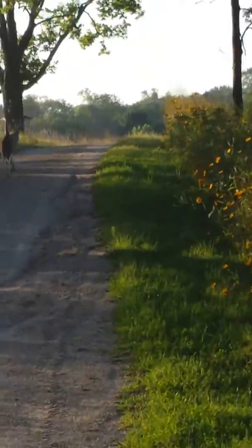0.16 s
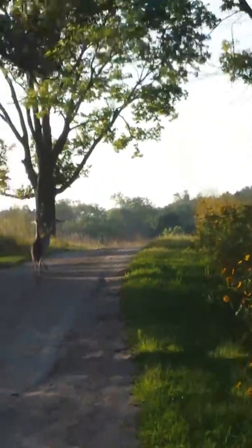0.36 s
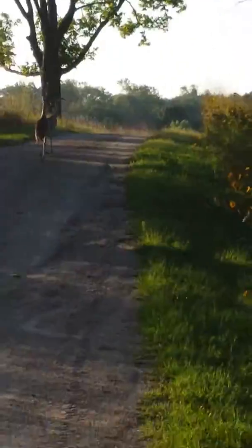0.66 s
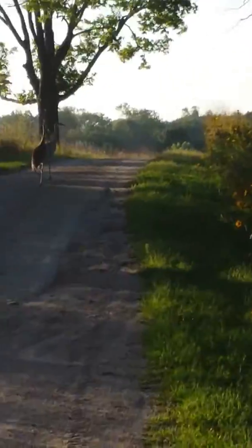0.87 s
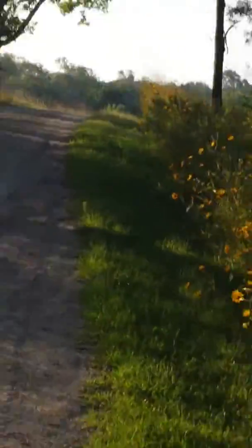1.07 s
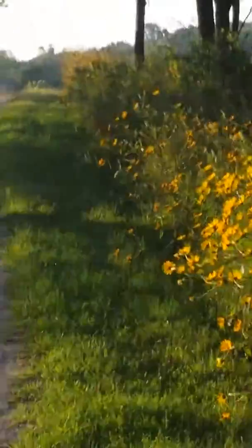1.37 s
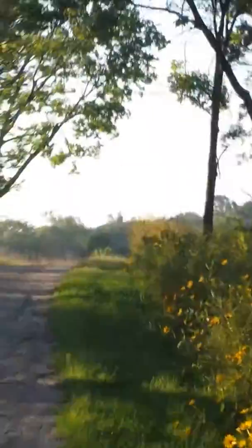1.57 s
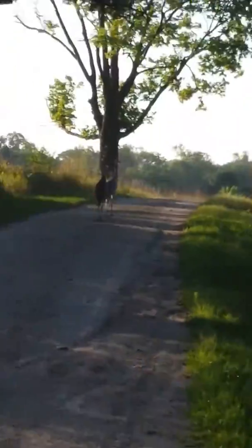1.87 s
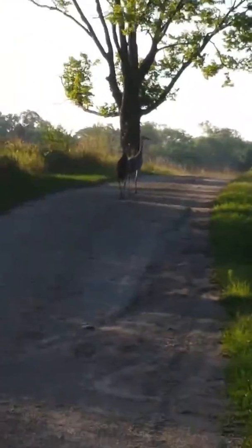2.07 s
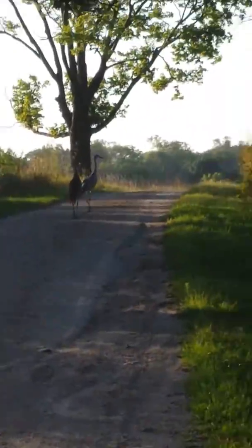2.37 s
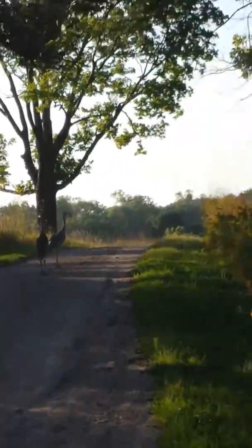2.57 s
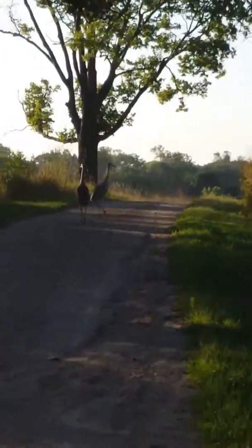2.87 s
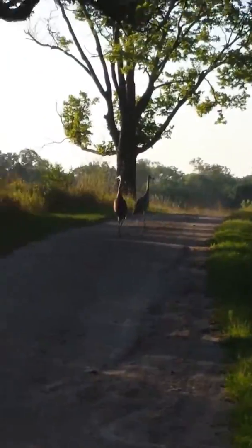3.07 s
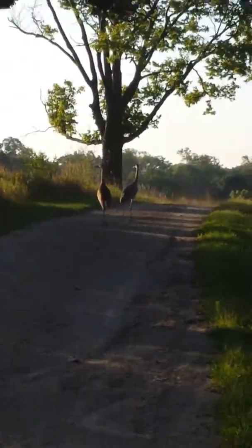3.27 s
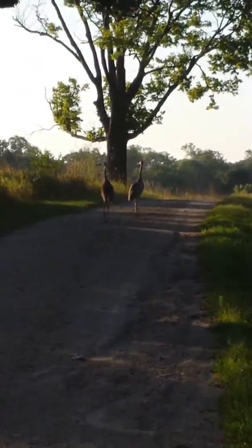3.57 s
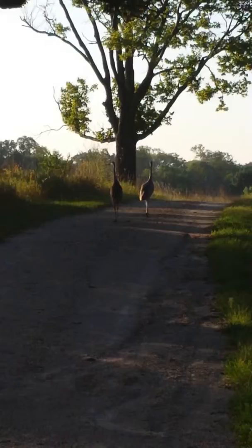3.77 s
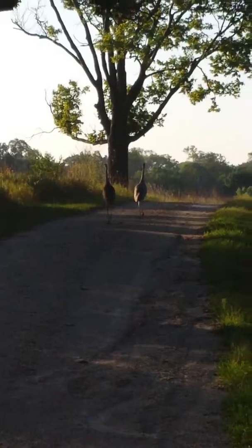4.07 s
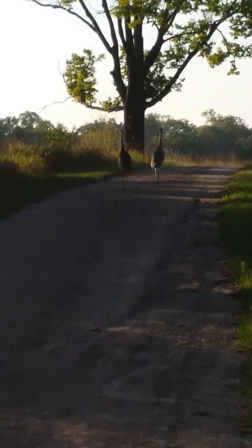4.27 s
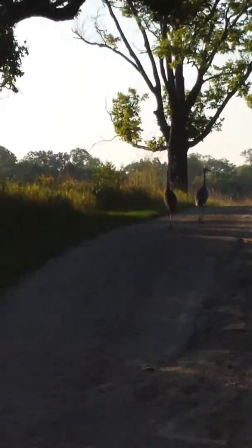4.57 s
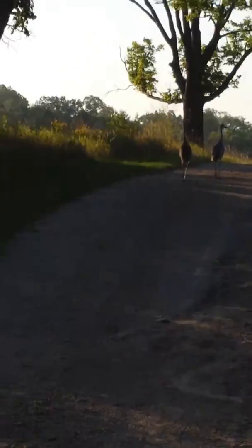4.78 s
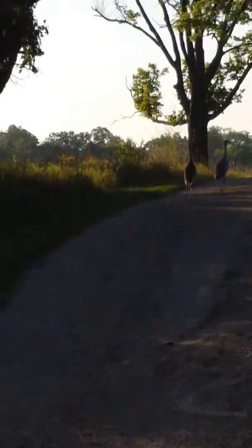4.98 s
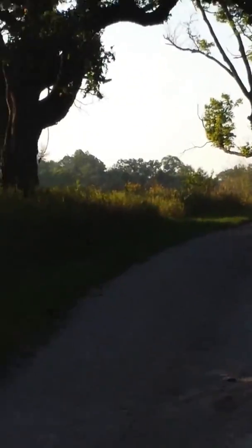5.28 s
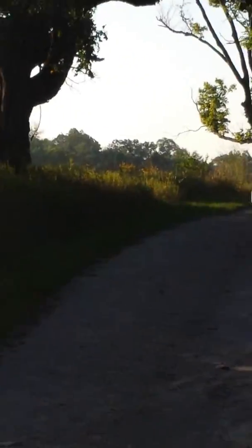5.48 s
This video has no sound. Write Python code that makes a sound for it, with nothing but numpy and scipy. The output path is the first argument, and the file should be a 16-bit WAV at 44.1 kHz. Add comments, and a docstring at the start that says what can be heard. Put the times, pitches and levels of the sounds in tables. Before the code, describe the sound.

A loud, hollow crane roll is already under way, with a higher, hoarser, fainter bird answering between its beats, and trees return a brief scattered echo. Then gritty footsteps and pebble clicks on a dirt track, with sharp finger ticks on the handheld device and light wind bumps mostly on the left. High crickets and a steady insect drone run throughout; the lower bird calls again at the very end.

```python
"""Two cranes on a dirt track

Two sandhill cranes give rolling calls, each beat a snap of the syrinx through a resonant throat, and
the trees around return scattered echoes. Ground crickets trill in the verge over a drone of far insects.
Someone follows with a hand-held camera: soles grind the grit, pebbles click, wind and soft pushes touch
mostly the left microphone, fingers tick and knock on the case. The sharpest ticks make the gain duck."""
import sys
import numpy as np
from scipy import signal
from scipy.fft import rfft, irfft, next_fast_len
from scipy.io import wavfile
from scipy.ndimage import uniform_filter1d, minimum_filter1d

SR = 44100
rng = np.random.default_rng(int(sys.argv[2]) if len(sys.argv) > 2 else 0)


def generate_wav(signal):
    """Clip the signal to [-1, 1] and save it as 16-bit WAV at the path in sys.argv[1]."""
    frames = np.transpose(np.atleast_2d(signal))
    scaled = np.clip(frames, -1, 1) * 32767
    pcm = np.round(scaled).astype(np.int16)
    wavfile.write(sys.argv[1], SR, pcm)


N = 248451
TIME = np.arange(N) / SR


def gain_of(db):
    """Decibels to a factor."""
    return 10 ** (np.asarray(db) / 20)


def evened(x):
    """Scales to rms 1."""
    return x / np.sqrt(np.mean(x ** 2) + 1e-20)


def read(points, hz):
    """Reads a table on a log-frequency axis."""
    f, value = np.transpose(points)
    return np.interp(np.log(hz + 1), np.log(np.abs(f) + 1), value)


def level(rows):
    """A gain curve from rows of (time_s, level_db)."""
    s, db = np.transpose(rows)
    return gain_of(np.interp(TIME, s, db))


def coloured(x, spectrum):
    """Gives a sound a spectrum, at rms 1."""
    length = x.shape[-1]
    size = next_fast_len(length)
    gain = gain_of(read(spectrum, np.fft.rfftfreq(size, 1 / SR)))
    return evened(irfft(rfft(x, size) * gain, size)[..., :length])


def drift(shape, per_s):
    """Smooth chance of rms 1: noise averaged twice over 1 / per_s seconds."""
    size = max(int(SR / per_s), 2)
    once = uniform_filter1d(rng.standard_normal(shape), size, mode="wrap")
    return evened(uniform_filter1d(once, size, mode="wrap"))


def sides(tilt_db):
    """Left and right gains for a level difference, left minus right."""
    return gain_of(np.array([[.5], [-.5]]) * tilt_db)


def diffuse(spectrum, tilt, shared):
    """Noise from all around, partly common to both microphones, at rms 1."""
    shared, size = np.clip(shared, 0, 1), next_fast_len(N)
    common = np.sqrt(shared) * rng.standard_normal(size)
    noise = common + np.sqrt(1 - shared) * rng.standard_normal((2, size))
    hz = np.fft.rfftfreq(size, 1 / SR)
    gain = gain_of(read(spectrum, hz)) * sides(read(tilt, hz))
    return evened(irfft(rfft(noise) * gain, size)[:, :N])


def add(mix, s, sound):
    """Mixes in a sound that starts at time s, cut at both ends of the mix."""
    start = round(s * SR)
    sound = sound[:, max(-start, 0):]
    part = mix[:, max(start, 0):][:, :sound.shape[1]]
    part += sound[:, :part.shape[1]]


def crane(roll, throat, dry_db, wet_db, tilt_db, after_s, after_length, after_fall, soften_db, last_db,
          snap_s, mellow_db):
    """A roll of beats, each trailed by two after-beats and by the echoes of the trees."""
    # distinct echoes from the nearest trunks, relative to the direct call: delay_s, level_db
    trunks = [(.036, -21), (.089, -24.5), (.148, -28), (.215, -32)]
    out = np.zeros((2, N))
    for s, hz, db, after_db, overtones_db, hoarse, fall, opening in roll:
        shape = [(f * opening, strength) for f, strength in throat]
        note = np.zeros((1, SR // 16))
        main = beat(hz, shape, overtones_db, hoarse, fall, snap_s=snap_s, mellow_db=mellow_db)
        add(note, 0, gain_of(db) * main[None])
        for k in (1, 2):
            after = beat(hz, shape, overtones_db + soften_db, hoarse, after_fall, after_length)
            add(note, k * after_s, gain_of(db + after_db + (k - 1) * last_db) * after[None])
        # the left microphone hears it a moment (6 samples) later
        direct = np.array([np.roll(note[0], 6), note[0]])
        add(out, s, gain_of(dry_db) * direct)
        for delay_s, echo_db in trunks:
            add(out, s + delay_s, gain_of(dry_db + echo_db) * direct)
        add(out, s, gain_of(wet_db) * trees(note[0]))
    return out * sides(tilt_db)


def beat(hz, throat, overtones_db, hoarse, fall, length=0.012, arch=.12, rasp_db=-15.5, snap_s=.0011,
         snap_db=5, mellow_db=14, rattle_db=-17):
    """The syrinx snaps open for a few cycles: harsh, then rounder, while the pitch arches and slides."""
    # air rasping as the syrinx opens, relative density: pitch_hz, level_db (per Hz)
    rasp_colour = [(300, -24), (1200, -0.5), (2400, 9.5), (3300, 3), (4300, 10), (5500, 5.5), (7500, -4.5),
                   (11300, -9.5), (13000, -44.5)]
    t = np.arange(SR // 40) / SR
    u, hoarse = np.minimum(t / length, 1), np.clip(hoarse, 0, .9)
    pitch = hz * (1 + fall * (.5 - u) + arch * (np.sin(np.pi * u) - np.pi / 4))
    # no two cycles are alike, which smears the overtones far more than the fundamental
    phase = 2 * np.pi * np.cumsum(pitch) / SR + (.08 + .6 * hoarse) * drift(len(t), 900)
    partials = []
    for k in range(1, 7):
        wander = .2 * (k - 1) * drift(len(t), 700)
        partials.append(gain_of(read(throat, k * pitch)) * np.sin(k * phase + wander))
    rasp = coloured(rng.standard_normal(len(t)), rasp_colour) * (1 + .7 * np.cos(phase))
    # hoarseness swaps the fundamental for throat-coloured noise
    croak = coloured(rng.standard_normal(len(t)), throat) * np.sqrt(.5)
    tone = np.abs(np.sin(np.pi * u)) ** .85 * ((1 - hoarse) * partials[0] + hoarse * croak)
    onset = 1 - np.exp(-(t / snap_s) ** 2)
    snap = onset * np.sqrt(1 - u) * gain_of(overtones_db + snap_db - mellow_db * u)
    # uneven slaps, one a cycle, ring the upper throat
    upper = [(hz, -40)] + [row for row in throat if row[0] > 1.7 * hz]
    rattle = coloured(rng.standard_normal(len(t)) * (1 + np.cos(phase)) ** 2, upper)
    return tone + snap * (sum(partials[1:]) + gain_of(rasp_db) * rasp + gain_of(rattle_db) * rattle)


def trees(x, clump_db=4):
    """Scattered echoes from trunks and leaves arrive in clumps, each band dying at its own speed."""
    # strength of what the trees return: pitch_hz, level_db
    echo = [(300, -25), (750, -20), (900, -4.5), (1030, 3), (1200, -0.5), (1400, -7), (1600, -8.5),
            (1880, -8.5), (2150, -5.5), (2550, -11.5), (3200, -3), (5000, -0.5), (8000, 1.5), (12000, 3)]
    # time the echoes take to fall by 60 dB: pitch_hz, t60_s
    echo_t60 = [(300, 0.82), (1000, 0.88), (2200, 0.58), (5000, 0.46), (12000, 0.33)]
    hz, t, z = signal.stft(rng.standard_normal((2, SR)), SR, nperseg=256)
    fade = gain_of(-60 * t / read(echo_t60, hz)[:, None]) * (1 - np.exp(-t / 0.006))
    clumps = uniform_filter1d(rng.standard_normal(fade.shape), size=3)
    fade *= gain_of(clump_db * evened(uniform_filter1d(clumps, size=9, axis=0)))
    # each band is evened, then takes its own strength
    fade *= gain_of(read(echo, hz))[:, None] / np.sqrt(SR * np.mean(fade ** 2, axis=1, keepdims=True))
    return signal.fftconvolve(x[None], signal.istft(z * fade, SR, nperseg=256)[1], axes=1)


def crickets(others_db=-45.0, tilt_db=-4, recede=1.0, count=10):
    """Four crickets close by, and more along the verge, each at its own pitch and pace."""
    # rhythm of the nearest crickets: first_stroke_s, period_s
    rhythms = [(.016, .0705), (.0375, .0701), (.028, .0745), (.034, .0646)]
    # their wing strokes, levels relative: top_pitch_hz, sag_hz, length_s, left_db, right_db
    strokes = [(6930, 780, .036, -34.5, -35.5), (7540, 900, .030, -41, -34.5), (7350, 600, .032, -42, -37),
               (7900, 700, .026, -54, -52)]
    # as the walker passes, the others follow this curve and the nearest go the opposite way: time_s, level_db
    crowd = [(0, 6.5), (.8, -3.5), (1.8, 0), (2.8, 2.5), (3.9, 3.5), (5.63, 3.5)]
    near = 0
    for rhythm, (hz, sag_hz, length, left_db, right_db) in zip(rhythms, strokes):
        near = near + gain_of([[left_db], [right_db]]) * cricket(*rhythm, hz, sag_hz, length)
    others = sum(cricket(rng.random(), rng.uniform(0.067, 0.07), hz, 550, .03)
                 for hz in np.linspace(6900, 7450, count))
    others = gain_of(others_db) * evened(others) * sides(tilt_db)
    return near / level(crowd) ** recede + others * level(crowd)


def cricket(first, period, hz, sag_hz, length, scatter_db=-9, scatter_s=0.045, waver_hz=55):
    """Each wing stroke draws a scraper over a file: the tone arches and sags; grass scatters it."""
    t = np.arange(SR // 10) / SR
    # time from the middle of the nearest stroke, slightly unsteady
    since = (TIME - first + .0018 * drift(N, 6) + period / 2) % period - period / 2
    u = np.clip(2 * since / length, -1, 1)
    vigour = drift(N, 13)  # a brisker stroke is higher and louder
    sag = sag_hz * (u + .1 + .12 * drift(N, 12)) ** 2
    pitch = hz - sag + waver_hz * drift(N, 705) + 50 * vigour
    stroke = np.cos(np.pi * u / 2) ** 1.6 * np.sin(2 * np.pi * np.cumsum(pitch) / SR)
    song = stroke * gain_of(1.6 * vigour + 2 * drift(N, 4))
    grass = evened(rng.standard_normal((2, len(t))) * np.exp(-t / scatter_s)) / np.sqrt(len(t))
    direct = np.array([song, np.roll(song, 1)])  # the two microphones catch it out of step
    return direct + gain_of(scatter_db) * signal.oaconvolve(song[None], grass, axes=1)[:, :N]


def footsteps(step_db=1, grains_per_s=2200, spread_db=2.5, tilt_db=4, crunch_q=2.9, count=4):
    """Grit slips under the sole in clumps as weight rolls on and off; each grain size has its own pitch."""
    # steps and scuffs, levels relative: hardest_grind_s, level_db, length_s, crunch_hz, crunch_db (to the grit)
    steps = [(0.44, -39.5, 0.69, 2200, -9.5), (1.073, -44, 0.36, 2000, -0.5),
             (1.547, -47.5, 0.41, 2220, -9), (1.66, -43, 0.15, 1000, 3), (1.731, -39.5, 0.16, 5600, -9),
             (2.408, -45, 0.047, 1500, -6), (2.537, -38, 0.34, 1390, -0.5), (2.966, -45.5, 0.43, 1310, 4),
             (4.624, -53, 0.11, 1590, 1), (5.212, -43.5, 0.59, 1869, -5.5)]
    # colour of the grit, relative density: pitch_hz, level_db (per Hz)
    grit_colour = [(30, -35), (150, -1), (500, -3.5), (900, -3), (1400, -5), (2300, -3.5), (3500, -11),
                   (6000, -6.5), (9000, -16.5), (14000, -62)]
    clump_db, clumps_per_s = 3, 200  # unevenness of the slipping, and its pace
    fade_db = 17.5  # heel and toe grind this much more softly than the middle of a step
    # three streams of grains: left, right and common to both
    grains, edges = np.zeros((3, N)), np.geomspace(250, 12000, count + 1)
    for band in zip(edges, edges[1:]):
        sizes = gain_of(spread_db * np.minimum(rng.exponential(1, (3, N)), 4))
        sizes = sizes * rng.standard_normal((3, N))
        slipping = rng.random((3, N)) < grains_per_s / SR
        slips = sizes * slipping * gain_of(clump_db * np.minimum(drift(N, clumps_per_s), 1.5))
        grains += signal.sosfilt(signal.butter(2, band, "bandpass", fs=SR, output="sos"), slips)
    grains = coloured(grains, grit_colour)
    grit, out = evened(grains[2] + 3.4 * grains[:2]), np.zeros((2, N))
    for s, db, length, hz, crunch_db in steps:
        crunch = gain_of(crunch_db) * signal.lfilter(*signal.iirpeak(hz, crunch_q, fs=SR), grit)
        out += (grit + crunch) * gain_of(db - fade_db * np.abs(2 * (TIME - s) / length) ** 0.92)
    return gain_of(step_db) * out * sides(tilt_db)


def ticks():
    """Fingers tick on the camera, whose case rings, and pebbles click underfoot."""
    # finger ticks: start_s, level_db, ring_hz, decay_ms, crack_share, tilt_db (left minus right)
    touches = [(1.201, -17, 3030, 0.93, 0.85, 5), (1.544, -20, 3000, .5, 1, 22),
               (1.69, -7, 3500, 0.28, 0.28, -7.5), (1.804, -6, 1290, 1, 0.65, 35),
               (2.0749, 15.5, 6340, 0.43, 0.0022, 31), (2.5159, -3.5, 5420, 1.5, 0.74, 25),
               (2.852, -20, 4500, .39, 0.88, 17), (4.2718, -18.5, 3570, 0.66, 0.88, 15.5),
               (4.3507, -2, 2900, 1.3, 1, 8.5), (4.3592, -21, 6000, .4, .8, 8),
               (4.3786, -2, 3420, 0.13, 0.78, 39), (4.3853, 1, 2100, 0.41, 0.3, -23)]
    # ring of the case, relative to the crack: pitch_hz, level_db, decay_ms
    case = [(1380, -39, 1.2), (1800, -36, 1.4), (2940, -26, 1.4), (3500, -24.5, 1.1), (5600, -18, 0.59)]
    # pebbles under the shoe: start_s, level_db, ring_hz
    pebbles = [(1.008, -29.5, 2100), (1.041, -25.5, 600), (1.105, -24, 1800), (1.13, -28, 2090),
               (1.1762, -30, 2700), (1.5563, -29.5, 2110), (1.620, -30, 2140), (1.661, -29, 1000),
               (1.674, -23.5, 1380), (1.7229, -23, 1330), (1.8202, -25.5, 1280), (2.631, -32, 2260),
               (2.6614, -25.5, 1500), (5.135, -31, 2130), (5.196, -24, 1980), (5.225, -25, 1375),
               (5.227, -23.5, 1870), (5.2578, -32, 3120), (5.262, -35, 3270)]
    out = np.zeros((2, N))
    for s, *touch in touches:
        add(out, s, tick(*touch, modes=case))
    for s, db, hz in pebbles:
        add(out, s, pebble(db, hz))
    return out


def tick(db, hz, decay_ms, crack, tilt_db, modes=(), tail_db=-34, tail_s=0.0094, rise_s=.00006):
    """A sharp crack and a ring of a few cycles, then a faint rustle."""
    # colour of the crack and rustle, relative density: pitch_hz, level_db (per Hz)
    crack_colour = [(100, -2), (600, 8), (1500, 9.5), (5000, 8.5), (7500, -1.5), (10000, -20), (14000, -59)]
    t = np.arange(SR // 12) / SR
    snap = coloured((np.arange(len(t)) == 8) * 1., crack_colour) * (t < .01)
    ring = np.sin(2 * np.pi * hz * t) * np.exp(-t * 10 ** 3 / decay_ms) * (1 - np.exp(-t / rise_s))
    rustle = gain_of(tail_db) * coloured(rng.standard_normal(len(t)), crack_colour) * np.exp(-t / tail_s)
    case = sum(gain_of(mode_db - 20 / np.log(10) * t * 10 ** 3 / ms) * np.sin(2 * np.pi * f * t)
               for f, mode_db, ms in modes)
    touch = (1 - crack) * ring + crack * (rustle + case - snap / snap.max())
    return gain_of(db - abs(tilt_db) / 2) * sides(tilt_db) * touch  # db holds on the louder side


def pebble(db, hz, crunch_db=-5, crunch_s=0.0018):
    """A stone clicks against its neighbours and crushes the sand between them."""
    decay_ms, crack_share, tilt_db = 1, .15, 6.5
    t = np.arange(SR // 12) / SR
    sand_colour = [(hz / 4, -18), (hz, 0), (2 * hz, -5), (5 * hz, -28)]
    sand = coloured(rng.standard_normal((2, len(t))), sand_colour)
    crunch = gain_of(db + crunch_db - abs(tilt_db) / 2) * sides(tilt_db) * sand * np.exp(-t / crunch_s)
    return tick(db, hz, decay_ms, crack_share, tilt_db) + crunch


def knocks(low_hz=115, sink_s=0.00256, boom_s=0.012):
    """A finger bumps the case: the ring sinks at once to a short low boom."""
    # duller bumps: start_s, level_db, top_pitch_hz, decay_ms, boom_db (to the blow), tilt_db (left minus right)
    bumps = [(1.5444, -21, 600, 1.1, -19, 16), (1.6895, -21.5, 1050, 0.98, -18, -8),
             (2.5152, -6, 1150, 0.56, -10, 22), (4.3498, -18, 1690, 0.47, -13.5, 26),
             (4.3860, -11.5, 990, 1.36, -26, -12)]
    out, t = np.zeros((2, N)), np.arange(SR // 12) / SR
    for s, db, top_hz, blow_ms, boom_db, tilt_db in bumps:
        pitch = low_hz + (top_hz - low_hz) * np.exp(-t / sink_s)
        fade = np.exp(-t * 10 ** 3 / blow_ms) + gain_of(boom_db) * np.exp(-t / boom_s)
        swing = np.sin(2 * np.pi * np.cumsum(pitch) / SR) * fade
        add(out, s, gain_of(db - abs(tilt_db) / 2) * sides(tilt_db) * swing)
    return out


def thumps(length=0.014, tilt_db=22):
    """Each push swings the diaphragm out and back about twice."""
    # soft pushes on the left microphone: start_s, left_level_db, pitch_hz
    pushes = [(0.864, -45, 149.1), (.946, -16, 123), (1.361, -20.5, 100), (5.261, -18.5, 129),
              (5.293, -17.5, 125), (5.377, -16, 112)]
    out, t = np.zeros((2, N)), np.arange(SR // 25) / SR
    for s, db, hz in pushes:
        swing = np.sin(2 * np.pi * hz * t) * np.sin(np.pi * np.minimum(t / length, 1)) ** 2
        add(out, s, gain_of([[db], [db - tilt_db]]) * swing)
    return out


def wind(left_db=4, right_db=-12):
    """Gusts swell and die over a light breeze, nearly all on the left microphone."""
    # separate gusts, before the side gains: peak_s, level_db, length_s
    gust_rows = [(0.132, -30.5, 0.072), (0.22, -33, 0.049), (0.35, -35, 0.11), (0.501, -32.5, 0.13),
                 (0.589, -34, 0.033), (0.886, -34.5, 0.15), (1.092, -30.5, 0.014), (1.21, -34, 0.027),
                 (1.433, -43, 0.13), (1.543, -39.5, 0.059), (5.344, -35, 0.15), (5.47, -33.5, 0.024),
                 (5.534, -33.5, 0.045)]
    # colour of the buffeting, relative density: pitch_hz, level_db (per Hz)
    buffet = [(12, -40), (20, -16.5), (43, -1), (101, 5), (162, -3), (274, -21.5), (335, -13), (600, -60),
              (780, -60.5), (1320, -120)]
    # light breeze on the microphone, before the side gains: time_s, level_db
    breeze = [(0, -45), (1.4, -50), (2.1, -63.5), (4.9, -78), (5.63, -40)]
    eddies = coloured(rng.standard_normal((2, N)), buffet)
    # flattened, so that breeze and gusts set the strength
    eddies /= np.sqrt(uniform_filter1d(eddies ** 2, size=1400) + 0.028)
    gusts = sum(gain_of(db) * np.exp(-(2 * (TIME - s) / length) ** 2) for s, db, length in gust_rows)
    return eddies * (level(breeze) + gusts) * gain_of([[left_db], [right_db]])


def meadow(chorus_db=-48, air_db=-47, flutter_db=2.0, crickets_db=-0.83):
    """The crickets, the fluttering blur of far insects and the low air, both as diffuse noise."""
    # drone of distant insects, relative density: pitch_hz, level_db (per Hz)
    chorus_colour = [(4400, -14), (5100, -4), (5600, 5), (5900, 1), (6100, -5), (6350, 6), (6800, -31.5),
                     (7300, -27.5), (7600, -15.5), (8100, -12.5), (9300, -24.5), (10800, -17.5),
                     (12000, -31.5), (13800, -23), (15000, -45)]
    # its balance: pitch_hz, tilt_db (left minus right)
    chorus_tilt = [(4500, -2.5), (5800, 6), (6500, 3), (7200, 0), (9000, -10), (14000, -19)]
    # distant rumble and air, relative density: pitch_hz, level_db (per Hz)
    air_colour = [(20, -20), (45, -9.5), (70, 2), (92, -0.5), (125, -2.5), (175, -10.5), (350, -12),
                  (520, -17), (1100, -25), (1800, -29), (3100, -30.5), (3850, -26.5), (4500, -34.5),
                  (7000, -52.5)]
    # its balance: pitch_hz, tilt_db (left minus right)
    air_tilt = [(60, 4), (400, 0), (1200, 10), (4000, 15)]
    chorus = gain_of(chorus_db + flutter_db * drift((2, N), 53))
    chorus = chorus * diffuse(chorus_colour, chorus_tilt, shared=0.13)
    air = gain_of(air_db + 1.5 * drift(N, 7.5)) * diffuse(air_colour, air_tilt, shared=0.8)
    return gain_of(crickets_db) * crickets() + chorus + air


def scene():
    """The two cranes, the meadow and the walker."""
    # beats of the lower bird's two rolls, levels before distance: start_s, pitch_hz, level_db,
    # after_beat_db (to the beat), overtones_db, hoarseness (0-1), fall (share of pitch), throat_factor
    low_roll = [(-.052, 800, -7.5, -10, -2, 0.15, 0.052, 0.97), (.0052, 793, -11, -9, -1, 0.12, 0.095, 1),
                (.0642, 780, -10.5, -8.5, -2.5, 0, 0.12, 1.04),
                (.1222, 774, -12, -4, -3.5, 0.14, 0.15, 1.03),
                (.1768, 760, -12.5, -5, -1, 0.01, -0.0095, 1.024), (.2305, 692, -13, -25, -9, 0, 0.11, 1),
                (5.4362, 711, -22.5, -1, -0.5, 0.29, -0.13, 1.02),
                (5.519, 751, -13, -1, -7, 0.11, 0.11, 1.015),
                (5.5896, 755, -14.5, 0.5, -3.5, 0.11, 0.046, 0.98)]
    # the higher bird answers between those beats: same columns
    high_roll = [(.070, 1105, -27.5, -27, -1, 0.32, 0.059, 1.04),
                 (.137, 1080, -27, -24, -1, 0.33, 0.18, 1.1),
                 (.2015, 1073, -27, -1, 0.15, 0.38, -0.096, 1.01),
                 (.266, 1041, -30, -7, 0, 0.59, -0.034, 1),
                 (.3285, 1090, -27, -10, -0.42, 0.44, .05, 0.996),
                 (.385, 947, -29, -2, -1.4, 0.35, 0.23, 0.87)]
    # strength of the partials in each throat, scaled in pitch by throat_factor: pitch_hz, level_db
    low_throat = [(300, -39), (520, -16), (740, -4), (900, -4), (1100, -30.5), (1550, -8.5), (2200, -9),
                  (2650, -16), (3150, -12.5), (3600, -20.5), (4300, -23.5), (6500, -24), (9000, -33.5),
                  (13000, -71)]
    high_throat = [(350, -15.5), (700, 0.5), (1050, 2.5), (1600, 2), (2150, 4.5), (2700, -8.5), (3300, -8),
                   (5000, -12), (9000, -21), (13000, -64.5)]
    low = crane(low_roll, low_throat, dry_db=2.0, wet_db=6.0, tilt_db=3, after_s=.0113,
                after_length=.0138, after_fall=.06, soften_db=-9.5, last_db=-10.0,
                snap_s=0.0021, mellow_db=13)
    high = crane(high_roll, high_throat, dry_db=0.5, wet_db=3.0, tilt_db=5.0, after_s=0.0065,
                 after_length=0.015, after_fall=.2, soften_db=0.0, last_db=-18,
                 snap_s=0.0025, mellow_db=6)
    return low + high + meadow() + wind() + thumps() + knocks() + footsteps() + ticks()


def held(excess, hold_s, settle_s):
    """Holds the highest recent peak for a while, easing toward it and back."""
    half = max(int(hold_s * SR / 2), 1)
    peak = -minimum_filter1d(-excess, 2 * half + 1, origin=half, mode="constant")
    keep = np.exp(-1 / (settle_s * SR))
    return signal.lfilter([1 - keep], [1, -keep], peak)


def record(dry):
    """Peaks over the limit turn the gain down, in a fast and a slow stage; then clipping and a treble limit."""
    limit_db, edge_hz = -4.5, 14900
    excess = np.maximum(20 * np.log10(np.abs(dry).max(axis=0) + 1e-9) - limit_db, 0)
    # dB of cut per dB of excess
    fast_cut_db = 0.85 * held(excess, hold_s=0.022, settle_s=0.0016)
    slow_cut_db = 1.132 * held(excess, hold_s=0.92, settle_s=0.22)
    clipped = np.clip(dry * gain_of(-(fast_cut_db + slow_cut_db)), -1, 1)
    lowpass = signal.firwin(255, edge_hz, window=("kaiser", 8), fs=SR)
    return signal.oaconvolve(clipped, lowpass[None], "same")


dry = scene()
out = record(dry)
generate_wav(out)
```